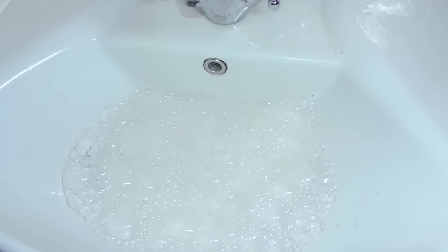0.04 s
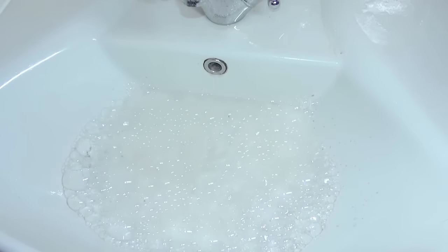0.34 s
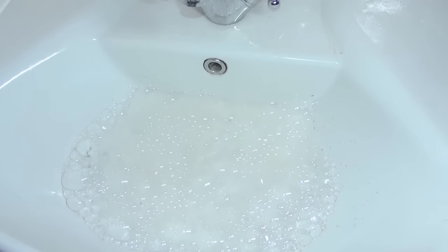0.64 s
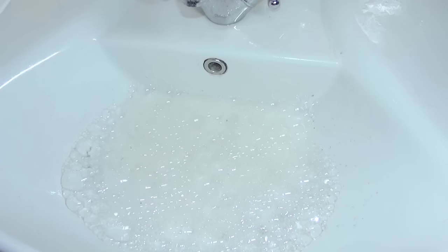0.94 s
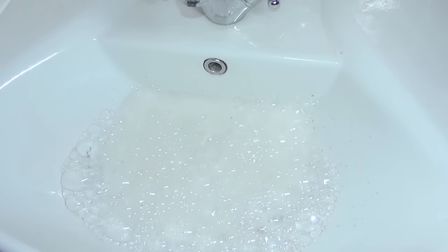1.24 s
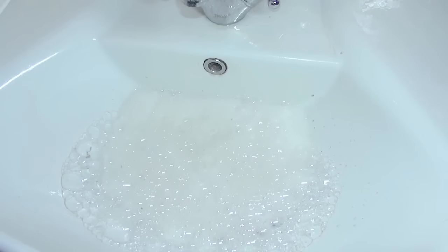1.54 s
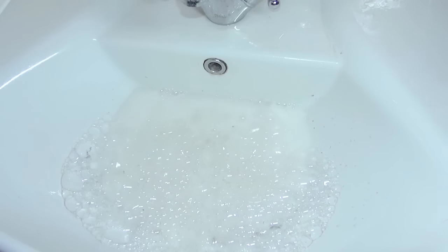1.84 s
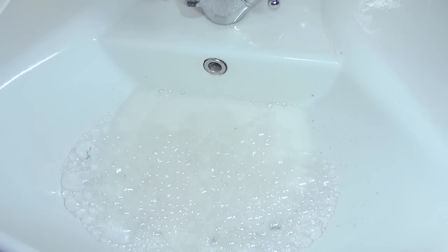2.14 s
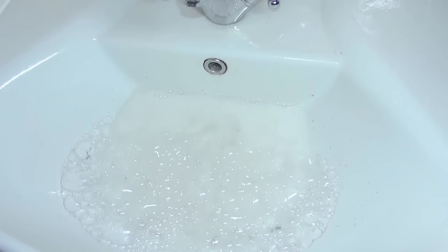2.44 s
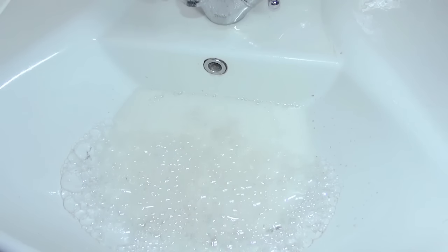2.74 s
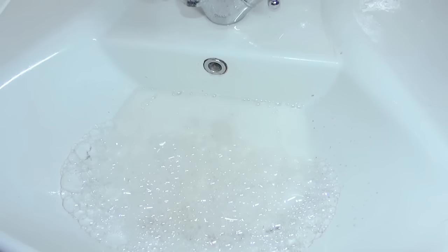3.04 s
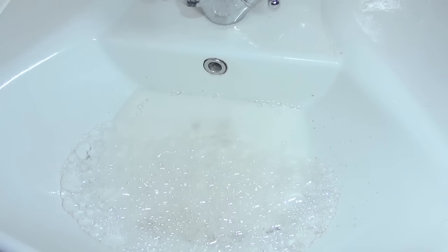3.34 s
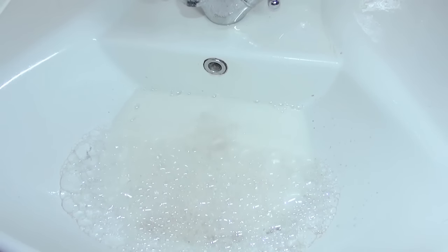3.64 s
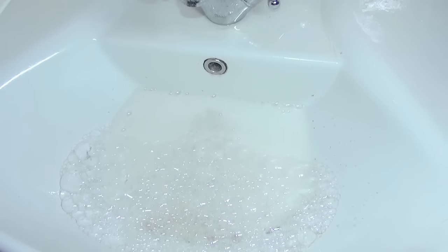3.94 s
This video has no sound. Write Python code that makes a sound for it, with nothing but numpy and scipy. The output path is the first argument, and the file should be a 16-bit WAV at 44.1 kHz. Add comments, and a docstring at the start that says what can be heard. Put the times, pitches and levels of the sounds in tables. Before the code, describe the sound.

Foam fizzes close by in a bathroom sink, countless tiny bubbles bursting into a steady, bright hiss. Late on, one larger bubble gives a small blip, followed by a soft hollow knock, over a faint room drone.

```python
"""Foam fizzing in a bathroom basin

Countless tiny bubbles burst, each ringing for an instant, and merge into a hiss that slowly swells,
coloured by the basin and reflected by the tiles. One larger bubble blips upward in pitch.
Underneath, the small room drones faintly, with a few dull rumbles and, near the end,
one soft knock on a hollow body."""
import sys
import numpy as np
from scipy import signal
from scipy.fft import rfft, irfft
from scipy.io import wavfile

SR = 44100
rng = np.random.default_rng(int(sys.argv[2]) if len(sys.argv) > 2 else 0)


def generate_wav(sig):
    """Save sig (samples, or channels by samples) to the path in sys.argv[1] as 16-bit PCM at SR."""
    pcm = np.round(np.clip(np.atleast_2d(sig).T, -1, 1) * 32767).astype(np.int16)
    wavfile.write(sys.argv[1], SR, pcm)


N = 176400
TIME = np.arange(N) / SR
BIN_HZ = np.maximum(np.arange(N // 2 + 1) * SR / N, 1)
ROOM_T60_S = 0.56


def foam(burst_db=-4, wash_db=-2):
    """Near bursts and their smooth wash, coloured by the basin."""
    # tone of the fizz: frequency_hz, level_db
    fizz_spectrum = [(100, -112), (250, -95), (520, -87.5), (650, -84), (750, -79.5), (1000, -77),
                     (1300, -78), (1500, -77.5), (2050, -75), (2700, -76.5), (3300, -76), (4000, -77),
                     (4900, -78.5), (5500, -80.5), (6100, -79), (7100, -80.5), (8600, -85), (9600, -85),
                     (11000, -81.5), (12300, -79.5), (14000, -78.5), (15700, -80)]
    # narrow resonances of the basin: pitch_hz, width_hz, boost_db
    basin_modes = [(718, 18, 6), (827, 23, 3.5), (1010, 23, 0.6), (1277, 43, 4), (1580, 44, 1),
                   (2300, 58, 1.5), (4850, 64, 2.5)]
    # stereo image, near mono at 1-4.5 kHz and above 11.6 kHz, wide at 5-11 kHz: frequency_hz, side_db
    stereo_image = [(850, -18), (1050, -64), (4500, -61), (5000, -13.5), (5250, -7), (6000, -5.5),
                    (9000, -4), (11250, -4), (11600, -50), (15000, -59)]
    # vigour of the fizzing: time_s, level_db
    vigour = [(0, -1.1), (.8, -1.54), (1.1, -1), (1.6, -0.46), (2.4, -0.24), (3.2, 0), (4, 0.3)]
    near = from_db(burst_db) * bubble_bursts()
    wash = from_db(wash_db) * rng.standard_normal(N)
    fizz = colour(near + wash, fizz_spectrum)
    basin_db = sum(db / (1 + (2 * (BIN_HZ - hz) / width) ** 2) for hz, width, db in basin_modes)
    mid = equalise(fizz, basin_db)
    side_hiss = colour(rng.standard_normal(N), fizz_spectrum)
    side = equalise(side_hiss, over_bins(stereo_image))
    swell = from_db(np.interp(TIME, *np.transpose(vigour)))
    return (mid + side * [[1], [-1]]) * swell


def bubble_bursts(bursts_per_s=26000, ring_cycles=24, spread_db=2, flurry_db=1, flurries_per_s=14):
    """Bubbles burst at random, small high ones most often; each rings briefly and echoes off the tiles."""
    pitches = np.geomspace(600, 16000, 48)
    crackle = np.zeros(N)
    for hz in pitches:
        pops = rng.random(N) < bursts_per_s * hz / pitches.sum() / SR
        strength = from_db(spread_db * np.minimum(rng.exponential(1, N), 4))
        polarity = rng.choice([-1, 1], N)
        rings = np.gradient(ring(pops * strength * polarity, hz, ring_cycles / hz))
        flurries = from_db(flurry_db * drift(flurries_per_s))  # patches of foam burst in flurries
        crackle += np.sqrt(hz) * rms_one(rings) * flurries  # weighted to a roughly white sum
    return rms_one(with_echoes(crackle, wet_db=-4.5))


def bubble_clusters():
    """Like-sized bubbles burst together, blurring into soft swells of pitched hiss."""
    # clusters of bubbles: peak_s, length_s, level_db, pitch_hz, width_hz
    clusters = [(.52, 0.4, -55.5, 940, 200), (1.14, 0.27, -49, 1790, 450), (1.46, 0.24, -51.5, 1950, 330),
                (3.19, .12, -54.5, 850, 170), (3.75, 0.3, -52, 4970, 800)]
    return swells(clusters)


def bubble_blip(start_s=2.884, level_db=-37.5, pitch_hz=860, rise_hz_per_s=2000):
    """A larger bubble rings briefly, rising in pitch as it reaches the surface."""
    attack_s, t60_s = 0.0021, 0.046
    age = np.maximum(TIME - start_s, 0)
    attack = np.minimum(age / attack_s, 1)
    decay_db = -60 * np.clip(age - attack_s, 0, 3 * t60_s) / t60_s
    phase = 2 * np.pi * (pitch_hz + rise_hz_per_s * age / 2) * age
    return attack * from_db(level_db + decay_db) * np.sin(phase)


def hollow_knock(contact_hz=490, low_cut_hz=175):
    """A soft, stuttering contact rings a hollow body, with a short tail in the tiled room."""
    # contacts within the one knock: start_s, strength_db
    contacts = [(3.38, -38), (3.3823, -28.5), (3.3856, -32), (3.3913, -32.5)]
    # resonances of the hollow body: pitch_hz, gain_db, t60_s
    body_modes = [(183, -18, 0.22), (240, -6, 0.013), (350, 1, 0.023), (470, -13, 0.14), (561, -16.5, 0.11)]
    clicks = np.zeros(N)
    for start_s, db in contacts:
        clicks[int(start_s * SR)] += from_db(db)
    soft_push = signal.sosfilt(signal.butter(2, contact_hz, fs=SR, output="sos"), clicks + 1e-18)
    body = sum(ring(soft_push, hz, t60_s) * from_db(db) for hz, db, t60_s in body_modes)
    body = signal.sosfilt(signal.butter(4, low_cut_hz, "high", fs=SR, output="sos"), body)
    return with_echoes(body, wet_db=-12.5)


def dull_rumbles():
    """Short swells of low noise come and go under the fizz."""
    # low rumbles: peak_s, length_s, level_db, pitch_hz, width_hz
    rumbles = [(.73, 0.14, -57, 370, 400), (.72, 0.044, -59, 165, 40), (1.727, 0.19, -62, 130, 45),
               (2.528, 0.039, -53, 380, 220), (2.645, 0.06, -53.5, 330, 480), (2.66, 0.092, -57.5, 118, 40),
               (2.692, 0.03, -51, 373, 180), (2.787, 0.047, -56.5, 133, 35), (2.88, 0.04, -59, 135, 35),
               (3.57, 0.04, -61.5, 108, 35), (3.66, 0.04, -63, 114, 30)]
    return swells(rumbles)


def room_tone(side_db=-10):
    """The room's resonances waver in a faint drone over a dark bed of noise."""
    # resonances of the room: pitch_hz, width_hz, level_db
    room_modes = [(137, 5.3, -69.5), (116, 14, -78.5), (155, 10, -72), (181, 20, -76.5), (325, 56, -75),
                  (349, 11, -74), (433.5, 63, -65), (572, 70, -73.5)]
    # tone of the noise bed: frequency_hz, level_db
    bed_spectrum = [(20, -107), (50, -105), (80, -103), (120, -99.5), (180, -93), (260, -95.5), (600, -108),
                    (1200, -135)]
    drone = sum(from_db(db) * resonant_noise(hz, width) for hz, width, db in room_modes)
    mid, side = colour(rng.standard_normal((2, N)), bed_spectrum)
    return drone + mid + from_db(side_db) * side * [[1], [-1]]


def with_echoes(sound, wet_db):
    """The tiles add a dense, dying tail of reflections."""
    tail = rng.standard_normal(SR) * from_db(-60 * TIME[:SR] / ROOM_T60_S)
    echoes = rms_one(signal.fftconvolve(sound, tail)[:N])
    return sound + from_db(wet_db) * sound.std() * echoes


def swells(rows):
    """Bands of resonant noise fade in and out along bell curves."""
    total = np.zeros(N)
    for peak_s, length_s, db, hz, width_hz in rows:
        bell = np.exp(-2 * ((TIME - peak_s) / length_s) ** 2)
        total += from_db(db) * bell * resonant_noise(hz, width_hz)
    return total


def resonant_noise(hz, width_hz):
    """Noise passed twice through one resonance, at unit rms."""
    detune = (BIN_HZ ** 2 - hz ** 2) / (BIN_HZ * width_hz)
    return rms_one(irfft(rfft(rng.standard_normal(N)) / (1 + detune ** 2), N))


def ring(clicks, hz, t60_s):
    """Each click sets off a dying sine of its own height."""
    decay = from_db(-60 / (t60_s * SR))
    step = 2 * np.pi * hz / SR
    return signal.lfilter([0, np.sin(step)], [1, -2 * decay * np.cos(step), decay ** 2], clicks + 1e-18)


def drift(turns_per_s):
    """A slow random wander with a spread near 1."""
    return np.interp(TIME * turns_per_s, np.arange(1000), rng.standard_normal(1000))


def colour(white, spectrum):
    """Give unit white noise a spectrum in dB per Hz."""
    return equalise(white, over_bins(spectrum)) * np.sqrt(SR / 2)


def equalise(sound, gain_db):
    """Boost or cut each frequency bin."""
    return irfft(rfft(sound) * from_db(gain_db), N)


def over_bins(points):
    """Join (frequency_hz, value) points by lines on a log-frequency axis."""
    hz, value = np.transpose(points)
    return np.interp(np.log(BIN_HZ), np.log(hz), value)


def from_db(db):
    """Decibels to gain."""
    return 10 ** (np.asarray(db) / 20)


def rms_one(sound):
    """Scale to unit rms."""
    return sound / np.sqrt(np.mean(sound ** 2) + 1e-20)


def scene(low_pan_db=0.74):
    """The foam sits in front, the low sounds a little to the left."""
    bubbles = foam() + bubble_clusters() + bubble_blip()
    lows = room_tone() + dull_rumbles() + hollow_knock()
    return bubbles + lows * from_db([[low_pan_db], [-low_pan_db]])


def record(dry, port_hz=8000, port_half_width_hz=2000, lean_db=2.5, cutoff_hz=15800):
    """The left microphone port is a little brighter; the very top is cut steeply."""
    port_band = np.exp(-((BIN_HZ - port_hz) / port_half_width_hz) ** 4)
    port_gain = from_db(lean_db / 2 * port_band * [[1], [-1]])
    top_cut = 1 / np.sqrt(1 + (BIN_HZ / cutoff_hz) ** 600)
    return irfft(rfft(dry) * port_gain * top_cut, N)


dry = scene()
out = record(dry)
generate_wav(out)
```